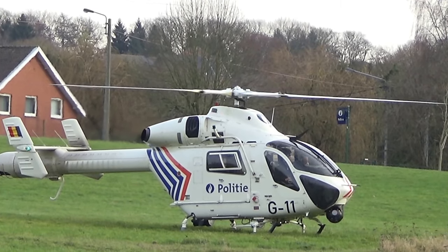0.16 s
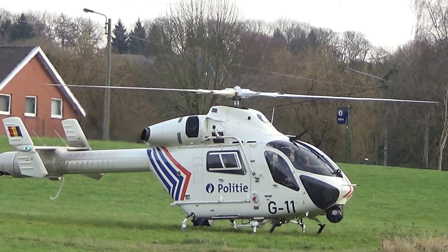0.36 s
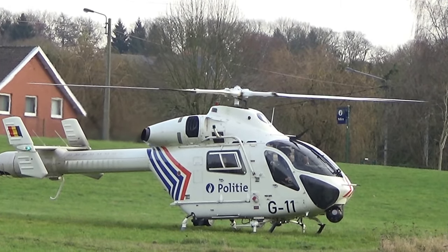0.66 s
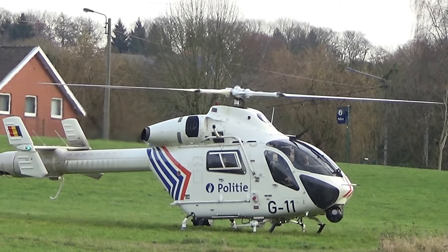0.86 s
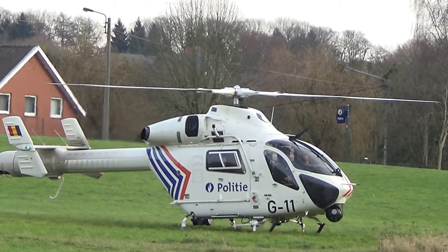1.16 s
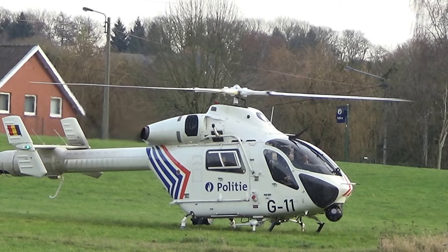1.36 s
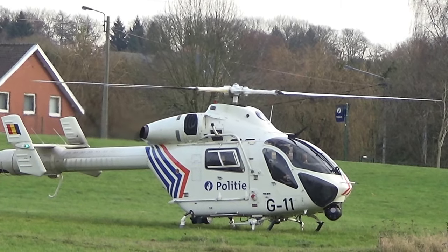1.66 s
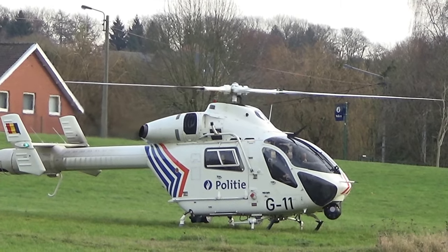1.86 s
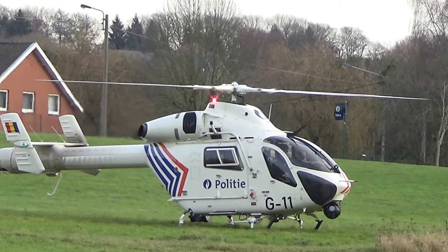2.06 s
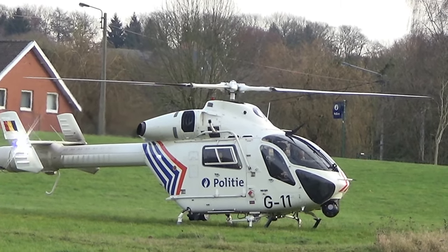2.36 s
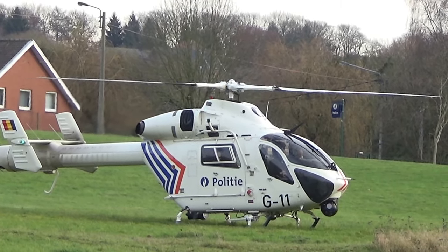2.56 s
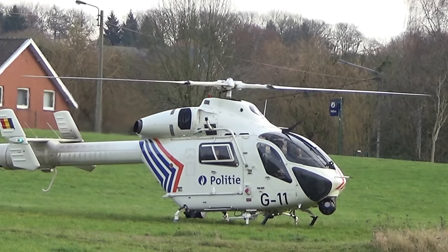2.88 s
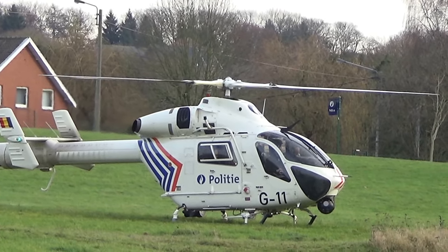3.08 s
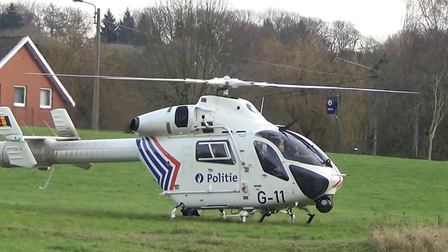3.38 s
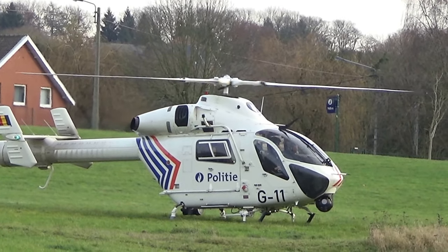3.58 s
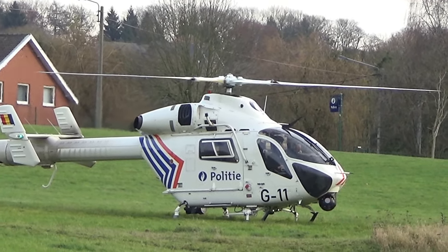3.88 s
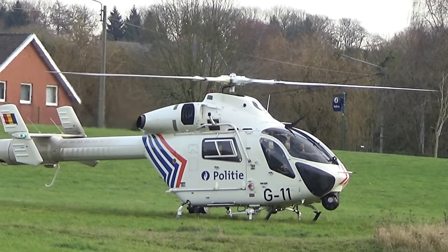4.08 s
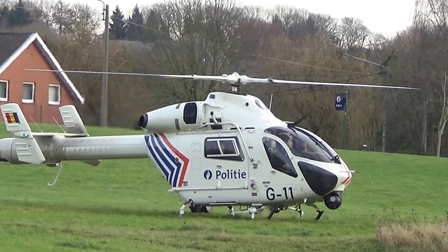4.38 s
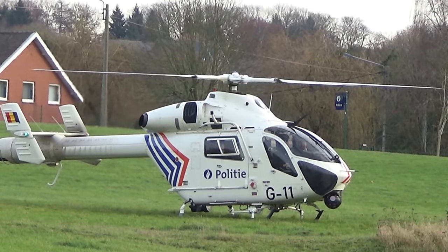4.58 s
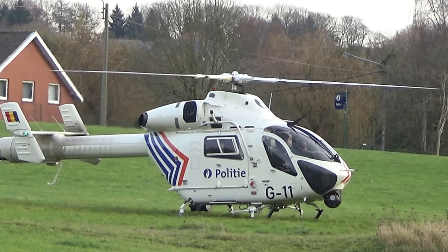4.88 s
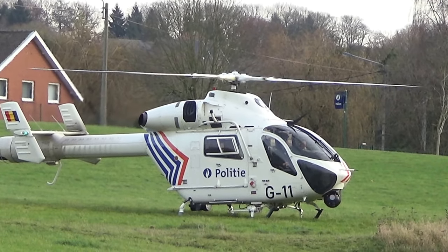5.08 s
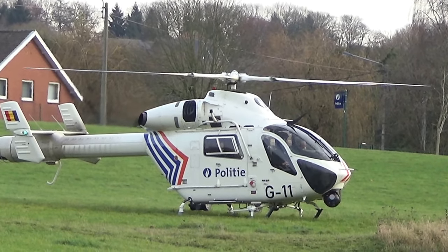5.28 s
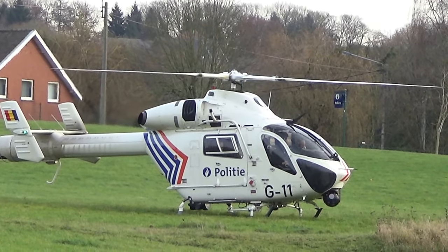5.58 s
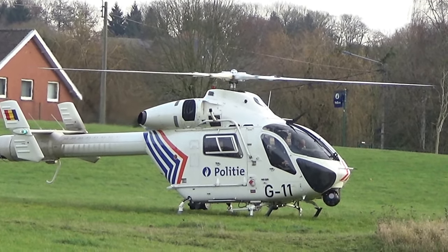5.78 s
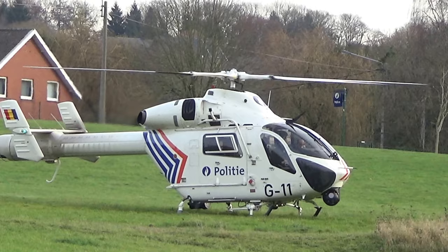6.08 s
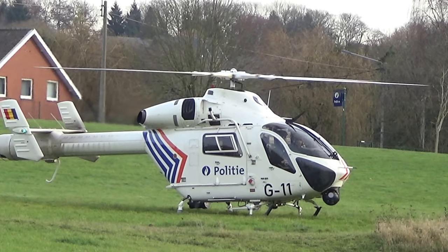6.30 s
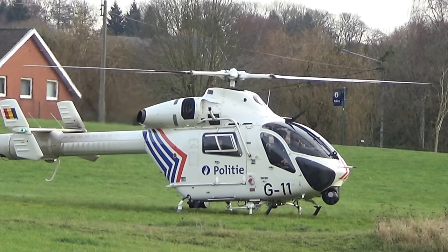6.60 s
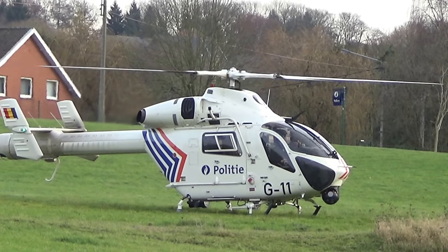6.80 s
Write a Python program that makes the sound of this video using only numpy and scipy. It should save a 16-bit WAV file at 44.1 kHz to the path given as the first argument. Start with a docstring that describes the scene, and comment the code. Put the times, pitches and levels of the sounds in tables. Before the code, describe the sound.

Steady hissing rush of a helicopter's turbine engines running in an open field, with a thin whine and gently wavering loudness.

```python
"""A steady rushing roar with a bright hiss: a helicopter stands on a grass field some way off,
both turbines running. The exhaust rumbles and roars, the ducts howl, the compressors hiss and
the intakes fizz. Each of these is a band of noise that swells and dips as moving air bends the sound.
Gearbox tones and a faint blade whine sit in the noise; trees and walls send back weak echoes."""
import sys
import numpy as np
from scipy import signal
from scipy.fft import rfft, irfft, next_fast_len
from scipy.io import wavfile
from scipy.ndimage import uniform_filter1d, map_coordinates

SR = 44100
rng = np.random.default_rng(int(sys.argv[2]) if len(sys.argv) > 2 else 0)


def put_to_file(sound):
    """Save the sound as 16-bit audio at rate SR, in the file named by the first command-line argument."""
    columns = np.atleast_2d(sound).T  # one column per channel
    safe = np.clip(columns, -1, 1)
    whole_steps = np.round(safe * 32767)
    wavfile.write(sys.argv[1], SR, whole_steps.astype(np.int16))


N = 306054

# How loud the tone of the meshing gear teeth is over time: t/s, level/dB
GEAR_LEVEL = [(0.03, -49), (0.47, -49), (0.53, -52.5), (0.83, -47.5), (0.95, -54), (1.14, -47.5),
              (1.43, -50.5), (1.62, -43), (1.68, -46.5), (2.37, -45.5), (2.39, -49.5), (3.2, -46),
              (5.02, -46.5), (5.42, -56), (6.77, -43.5), (6.92, -47)]
# How loud the compressor hiss is over time: t/s, level/dB
HISS_LEVEL = [(0.03, -26.5), (0.45, -27), (1.22, -36), (1.6, -22.5), (1.97, -28), (2.01, -29), (3.56, -33),
              (3.6, -37.5), (4.1, -35), (4.16, -40), (4.42, -29), (5.08, -35.5), (5.58, -28.5),
              (6.05, -32.5), (6.07, -28.5), (6.63, -31), (6.82, -26), (6.92, -27)]


def amp(db):
    """Turn decibels into a factor to multiply by."""
    return 10 ** (np.asarray(db) / 20)


def unit(x):
    """Scale a signal to an average strength (rms) of 1."""
    return x / np.sqrt(np.mean(x ** 2) + 1e-20)


def at_frequency(table, hz, column=1, outside=None):
    """Read between the rows of a table, on a logarithmic frequency axis."""
    rows = np.array(table)
    return np.interp(np.log(hz + 1), np.log(rows[:, 0] + 1), rows[:, column], outside, outside)


def level_curve(table, glide_s=0.026):
    """A level in dB for every sample, with rounded corners because moving air shifts smoothly."""
    times, levels = np.transpose(table)
    steps = np.arange(0, N + 128, 128)
    rounded = uniform_filter1d(np.interp(steps / SR, times, levels), int(glide_s * SR / 128) + 1)
    return np.interp(np.arange(N), steps, rounded)


def swing(table):
    """How many dB a level lies above or below its own average."""
    level = level_curve(table)
    return level - level.mean()


def wobble(rate):
    """A smooth curve through `rate` random values a second."""
    steps = np.arange(0, N + 64, 64)
    coarse = map_coordinates(rng.standard_normal(int(N * rate / SR) + 4), [steps * rate / SR])
    return np.interp(np.arange(N), steps, coarse)


def filtered(x, response):
    """Multiply each frequency in x by response(hz)."""
    size = next_fast_len(N + SR // 2)
    return irfft(rfft(x, size) * response(np.fft.rfftfreq(size, 1 / SR)), size)[..., :N]


def tone(hz, drift_hz, flutter_db):
    """A pure tone whose pitch and strength waver."""
    phase = 2 * np.pi * np.cumsum(hz + drift_hz * wobble(6)) / SR
    return np.sqrt(2) * amp(flutter_db * wobble(5)) * np.sin(phase + rng.uniform(0, 2 * np.pi))


def patches(shape, bins, frames):
    """A random map, smoothed over `bins` steps of frequency and `frames` steps of time."""
    across_frequency = uniform_filter1d(rng.standard_normal(shape), size=bins, axis=0)
    return unit(uniform_filter1d(across_frequency, size=frames, axis=1))


def duct_boost(hz):
    """The dB added near the pitches at which the ducts and intakes ring."""
    # Duct and intake resonances: f/Hz, width/Hz, boost/dB
    resonances = [(1680, 120, 2.5), (1900, 80, 2), (2100, 90, 3), (2480, 120, 4.5), (2760, 100, 5.5),
                  (3080, 50, 2.5), (3240, 90, 3.5), (3410, 100, 4.5), (3520, 70, 4), (3740, 150, 4),
                  (3910, 50, 2.5), (4070, 80, 3.5), (4150, 60, 4.5), (4350, 40, 3), (4430, 60, 2.5),
                  (4585, 70, 3), (4715, 80, 5), (4835, 60, 4.5), (5060, 60, 2.5), (5420, 100, 1.5),
                  (5550, 60, 2.5), (5930, 130, 3.5), (8030, 300, 1.2)]
    grid = np.arange(0, 9000, 10.)
    boost = sum(db * amp(-6 * (2 * (grid - centre) / width) ** 2) for centre, width, db in resonances)
    return np.interp(hz, grid, boost)


def rush(spectrum, patchy_db):
    """Air rushing through the ducts (rms 1); swirls make louder and softer patches in the noise."""
    shape = (257, N // 256 + 3)  # frequency steps, time steps
    even_noise = rng.standard_normal(shape) + 1j * rng.standard_normal(shape)
    wide_brief, narrow_slow = patches(shape, bins=9, frames=26), patches(shape, bins=2, frames=70)
    swirls = amp(patchy_db * (.7 * wide_brief + 1.25 * narrow_slow))
    noise = signal.istft(even_noise * swirls, window="cosine", nperseg=512)[1][:N]

    def colour(hz):
        in_band = (hz > spectrum[0][0]) & (hz < spectrum[-1][0])
        return in_band * amp(at_frequency(spectrum, hz) + duct_boost(hz))
    return unit(filtered(noise, colour))


def echoes(direct, fade_s=0.6):
    """Trees and walls scatter the sound back as a dense, fading cloud of weak echoes."""
    # Strength of the echoes next to the direct sound: f/Hz, level/dB
    echo_spectrum = [(40, -18), (100, -34), (220, -42), (350, -28), (500, -29.5), (950, -18.5), (1300, -24),
                     (2000, -22), (4000, -20.5), (8500, -21), (9600, -46), (13000, -46)]
    t = np.arange(SR // 2) / SR
    cloud = rng.standard_normal(len(t)) * amp(-60 * t / fade_s)
    scattered = signal.fftconvolve(direct, cloud / np.linalg.norm(cloud))[:N]
    return filtered(scattered, lambda hz: amp(at_frequency(echo_spectrum, hz)))


def exhaust():
    """The exhaust makes a steady rumble and a low drone that gently swells with the gear tone."""
    # Tone colour of each noise: f/Hz, relative level/dB
    rumble_spectrum = [(15, -57), (25, -27), (38, -24), (65, -21), (98, -7.5), (151, -1), (204, 1),
                       (291, -9.5), (318, -11.5), (360, -18.5), (470, -39), (790, -120)]
    drone_spectrum = [(300, -40), (330, -16.5), (430, -11), (530, -2), (680, 1), (880, -2), (1020, -4),
                      (1200, -25)]
    rumble = amp(-57) * rush(rumble_spectrum, patchy_db=1.7)
    drone = amp(-46.5 + 0.3 * swing(GEAR_LEVEL)) * rush(drone_spectrum, patchy_db=0.26)
    return rumble + drone


def gearbox():
    """Meshing teeth sing one clear tone; shafts and gears add a few weak ones."""
    # Weak shaft and gear tones: f/Hz, level/dB
    weak_tones = [(608, -59), (920, -64), (1496, -53.5), (1524, -56)]
    weak = sum(amp(db) * tone(hz, drift_hz=2.465, flutter_db=3.5) for hz, db in weak_tones)
    mesh = amp(level_curve(GEAR_LEVEL)) * tone(762.3, drift_hz=0.88, flutter_db=1.5)
    return mesh + weak


def intakes():
    """Intakes, seals and bleed air (let off the compressors) hiss; moving air makes them flicker."""
    # Tone colour of each noise: f/Hz, relative level/dB
    bleed_spectrum = [(4600, -54), (4950, -1), (5300, 0), (5650, -3), (6200, -40)]
    seals_spectrum = [(5300, -43), (5750, -1), (6200, -1.5), (7000, -2), (7700, -38)]
    fizz_spectrum = [(6600, -30), (7200, -4.5), (8000, -2), (9000, -5), (9700, -9), (10800, -32)]
    sizzle_spectrum = [(9000, -22), (9800, -1.5), (10600, -1), (11600, -10), (12800, -19.5), (13900, -27)]
    # Slow swells and dips on the way through moving air: t/s, level/dB
    bleed_level = [(0.03, -31), (0.45, -26), (0.8, -35.5), (1.39, -36.5), (1.7, -24.5), (1.89, -32),
                   (2.03, -26), (2.2, -31), (3.39, -38.5), (3.5, -32), (4.04, -42.5), (4.67, -31.5),
                   (4.94, -38.5), (5.38, -31.5), (5.94, -37), (6.31, -31), (6.46, -41), (6.73, -34),
                   (6.82, -26.5), (6.92, -29)]
    fizz_level = [(0.03, -28), (0.76, -35), (1.47, -34), (1.55, -29.5), (1.85, -27), (1.97, -21),
                  (2.18, -26.5), (3.04, -33), (3.14, -29.5), (3.27, -36), (3.5, -35), (3.6, -28),
                  (3.71, -35.5), (3.89, -35), (3.96, -40.5), (4.08, -37.5), (4.42, -40), (4.56, -29.5),
                  (4.86, -36), (5.21, -36.5), (5.29, -29.5), (5.48, -34.5), (5.54, -27), (5.59, -28),
                  (5.75, -37), (6.07, -34), (6.11, -29.5), (6.53, -36.5), (6.67, -31.5), (6.92, -27)]
    # Seals and sizzle each share their path through the air with two other layers, so they follow them.
    seals_db = -36.5 + 0.57 * swing(bleed_level) + 0.46 * swing(fizz_level)
    sizzle_db = -41.5 + 0.29 * swing(HISS_LEVEL) + 0.65 * swing(fizz_level)
    flicker = wobble(11) + wobble(4.52)
    bleed = amp(level_curve(bleed_level) + 0.97 * flicker) * rush(bleed_spectrum, patchy_db=0.74)
    seals = amp(seals_db + 0.49 * flicker) * rush(seals_spectrum, patchy_db=1.15)
    blade_whine = amp(-23) * tone(9103, drift_hz=6.0, flutter_db=6)
    fizz_gain = amp(level_curve(fizz_level) + 0.55 * flicker)
    fizz = fizz_gain * (rush(fizz_spectrum, patchy_db=1.37) + blade_whine)
    sizzle = amp(sizzle_db + 0.33 * flicker) * rush(sizzle_spectrum, patchy_db=2.1)
    return bleed + seals + fizz + sizzle


def turbines():
    """Exhaust roar, duct howl, compressor hiss and whistle each swell on their own as the air shifts."""
    # Tone colour of each noise: f/Hz, relative level/dB
    roar_spectrum = [(900, -23), (1050, -11), (1200, -3.5), (1450, -4), (1700, -1), (1920, -1.5),
                     (2150, -4), (2600, -14)]
    howl_spectrum = [(1900, -24), (2200, -4.5), (2450, -2), (2900, -1), (3150, -7), (3700, -21)]
    hiss_spectrum = [(2800, -41), (3150, -1.5), (3500, -0.5), (4300, 0.5), (4700, -4), (5300, -37)]
    whistle_spectrum = [(4200, -30), (4480, -5), (4600, -1), (4850, 0), (4950, -6), (5250, -30)]
    # Swells and dips on the way through moving air: t/s, level/dB
    roar_level = [(0.0, -39), (0.23, -39.5), (1.29, -35.5), (1.62, -32.5), (2.8, -38), (3.11, -34.5),
                  (4.83, -39.5), (5.93, -34.5), (6.63, -40), (6.92, -35.5), (6.94, -38)]
    howl_level = [(0.03, -32.5), (1.31, -35), (1.66, -26), (2.23, -34.5), (2.83, -31.5), (2.97, -40),
                  (3.14, -30), (3.48, -28), (4.04, -36), (4.35, -31), (4.37, -29), (4.9, -33.5),
                  (5.71, -30.5), (6.05, -31), (6.19, -32), (6.51, -33), (6.88, -28.5), (6.92, -27.5)]
    whistle_level = [(0.03, -30), (0.49, -26), (1.37, -40.5), (1.57, -24.5), (1.7, -21.5), (1.95, -29),
                     (3.43, -39), (3.6, -35), (3.73, -44), (4.19, -37.5), (4.25, -46), (4.35, -34),
                     (4.44, -37), (4.52, -28), (4.58, -33), (4.65, -30), (5.02, -40), (5.56, -32),
                     (5.98, -39), (6.07, -32.5), (6.42, -34), (6.53, -41), (6.84, -26), (6.92, -28)]
    roar = amp(level_curve(roar_level)) * rush(roar_spectrum, patchy_db=0.3)
    howl = amp(level_curve(howl_level)) * rush(howl_spectrum, patchy_db=0.68)
    hiss = amp(level_curve(HISS_LEVEL)) * rush(hiss_spectrum, patchy_db=1.43)
    whistle = amp(level_curve(whistle_level)) * rush(whistle_spectrum, patchy_db=0.5)
    return roar + howl + hiss + whistle


def scene():
    """The helicopter is straight ahead; only its echoes spread to the sides."""
    direct = turbines() + intakes() + exhaust() + gearbox()
    side = echoes(direct)
    return np.array([direct + side, direct - side])


def record(dry):
    """The microphone housing favours left or right depending on pitch; the highest treble is cut off."""
    # Left opening compared with the right one: f/Hz, level/dB, phase lag/rad
    openings = [(800, 1.5, -0.034), (950, 1.5, -0.31), (1290, 0.4, 0), (1640, 2.5, 0.3), (1980, 1.5, 0.067),
                (2340, -1.5, 0.33), (2670, 1.5, 0.068), (3200, -2, 0), (3700, 2.8, 0.11), (4050, -3, 0),
                (4440, 4, -0.073), (5030, 0, 0.28), (6400, 0.5, .04), (7300, -0.2, 0.14),
                (9300, -0.7, 0.033), (9600, -1, 0)]
    share = np.array([[.5], [-.5]])  # each side takes half, in opposite directions
    top_hz = 13800

    def housing(hz):
        gain = amp(share * at_frequency(openings, hz, outside=0))
        lag = share * at_frequency(openings, hz, column=2, outside=0)
        return gain * np.exp(-1j * lag) * (hz < top_hz)
    return filtered(dry, housing)


dry = scene()
out = record(dry)
put_to_file(out)
```